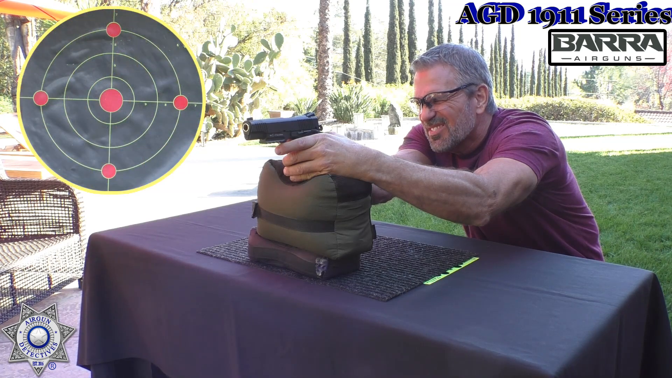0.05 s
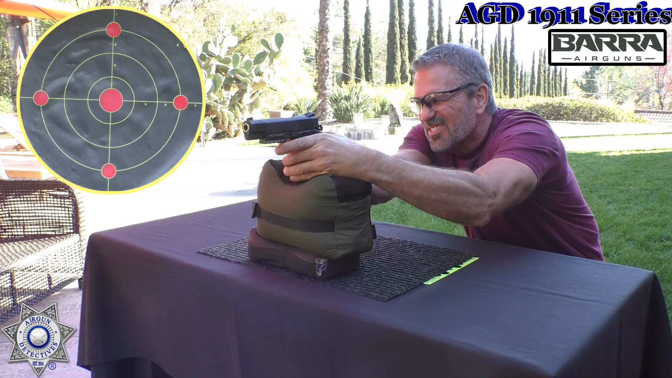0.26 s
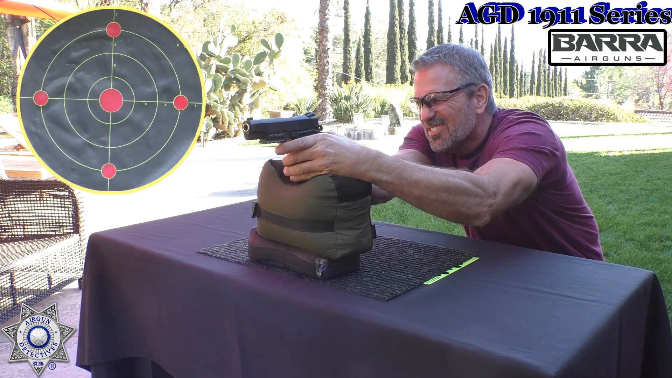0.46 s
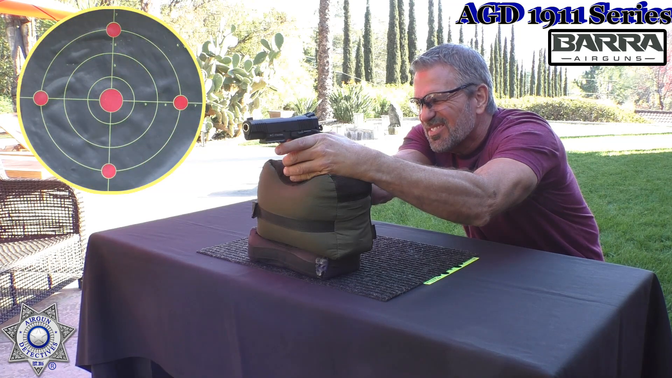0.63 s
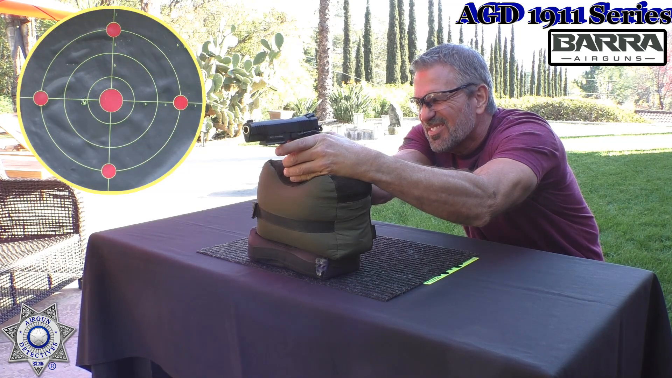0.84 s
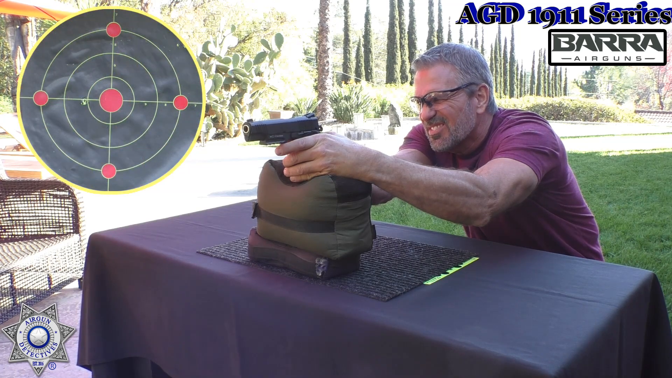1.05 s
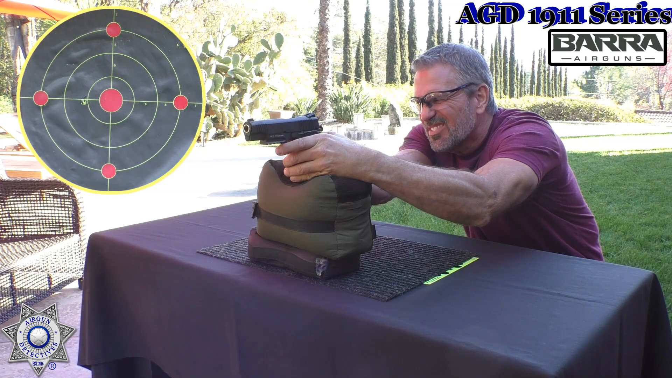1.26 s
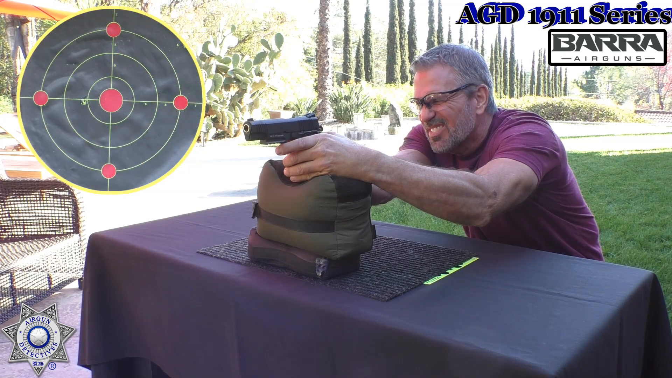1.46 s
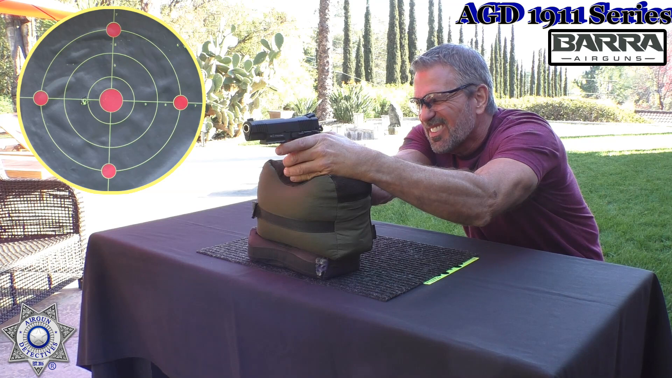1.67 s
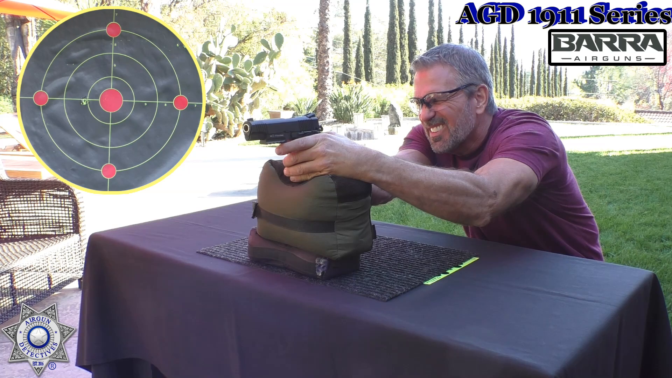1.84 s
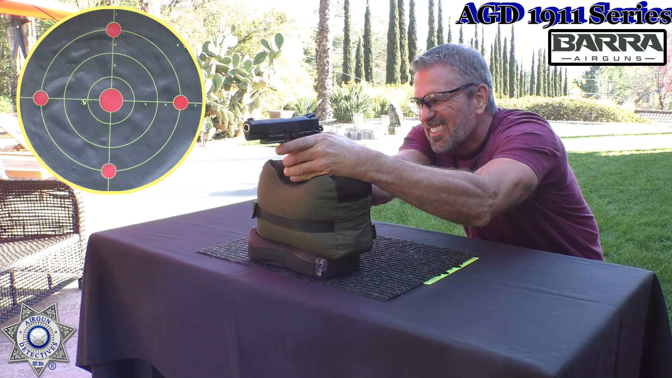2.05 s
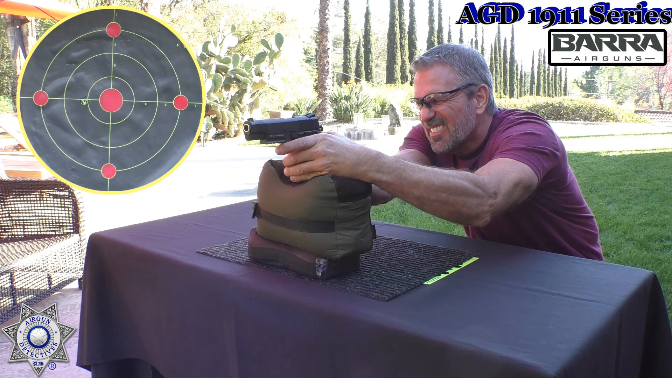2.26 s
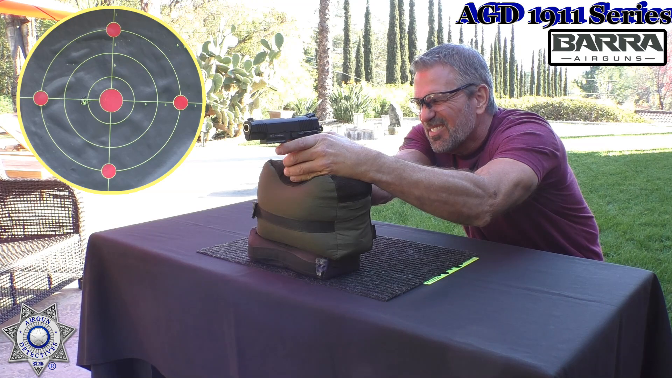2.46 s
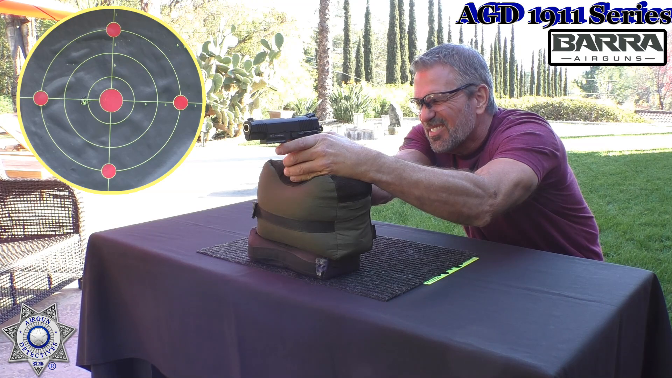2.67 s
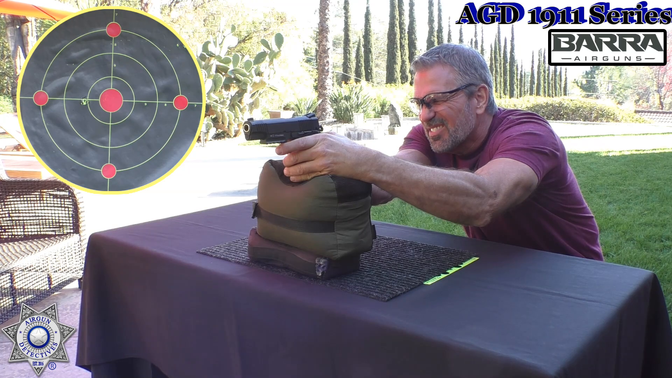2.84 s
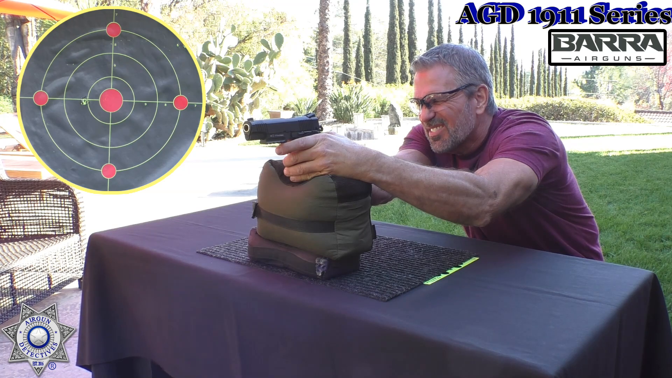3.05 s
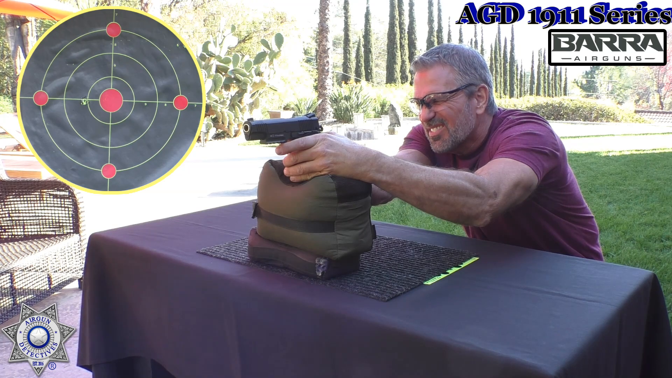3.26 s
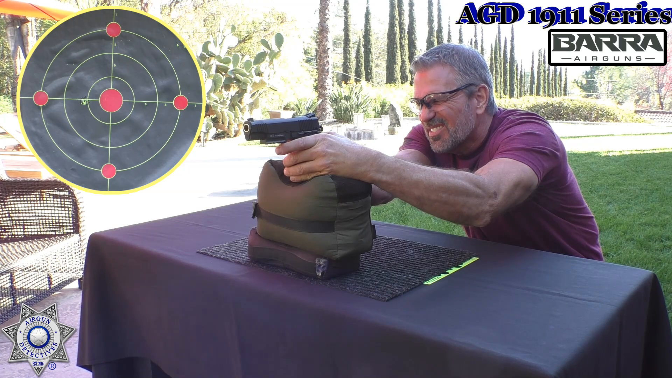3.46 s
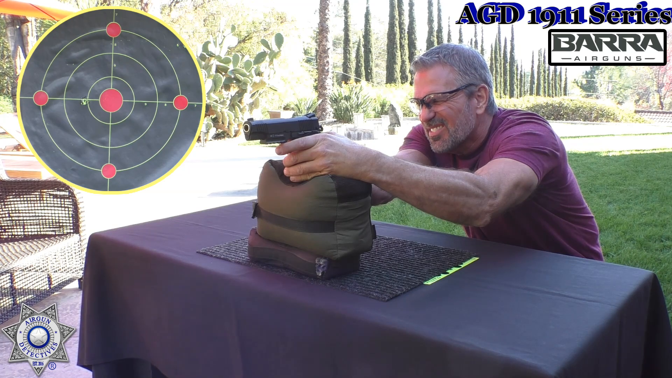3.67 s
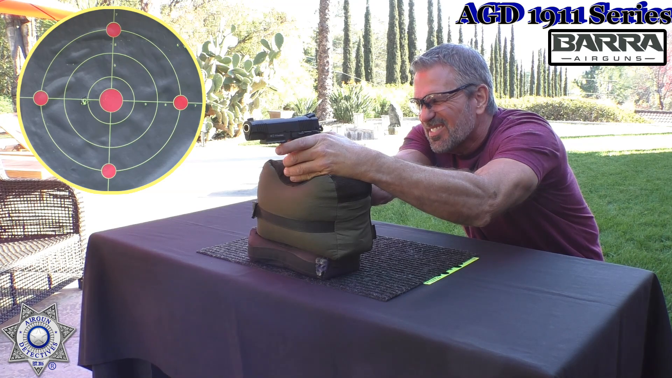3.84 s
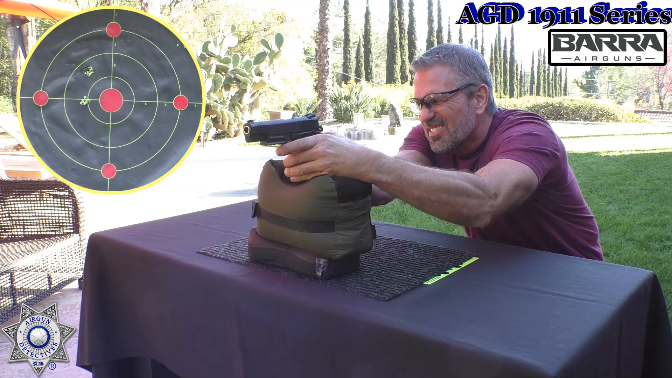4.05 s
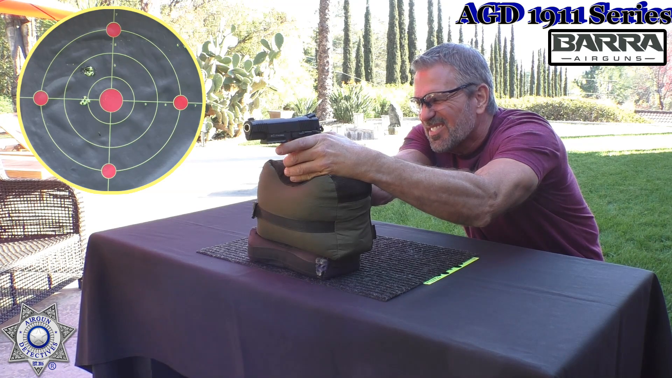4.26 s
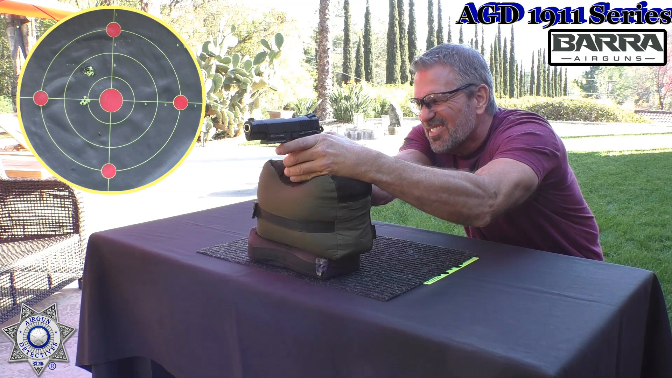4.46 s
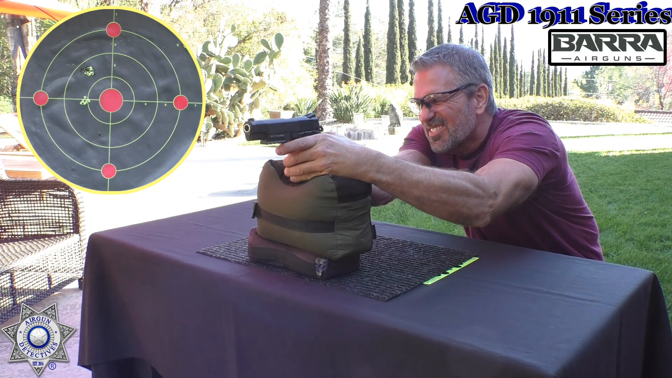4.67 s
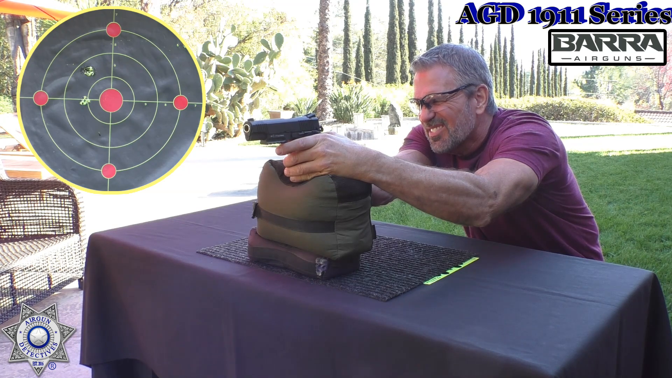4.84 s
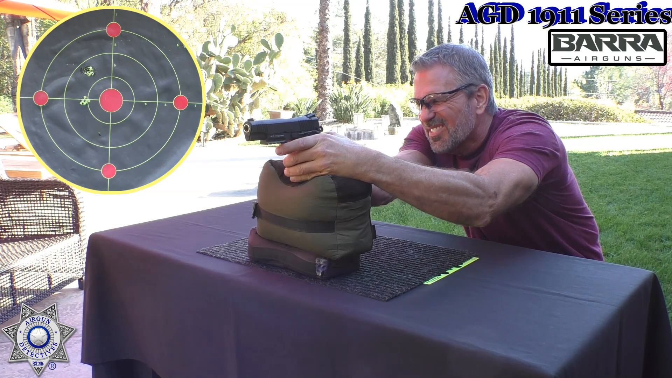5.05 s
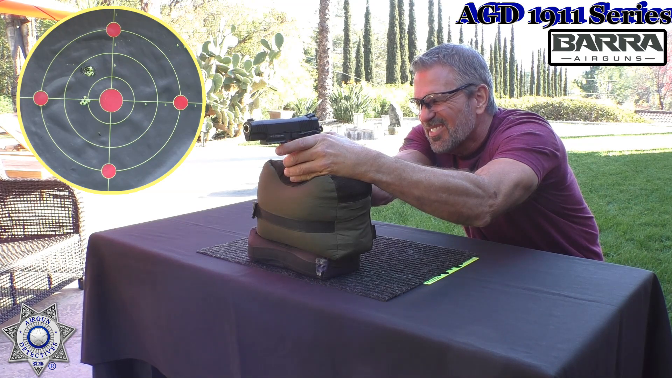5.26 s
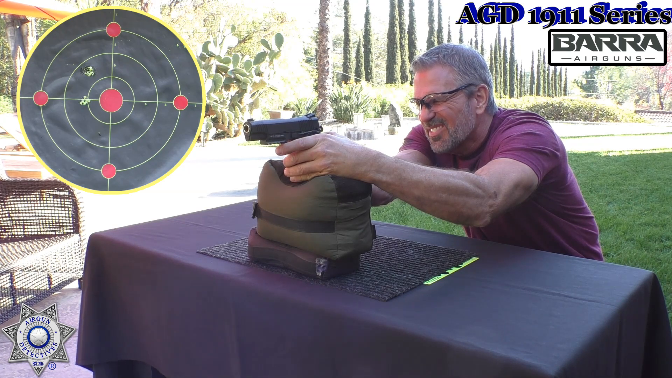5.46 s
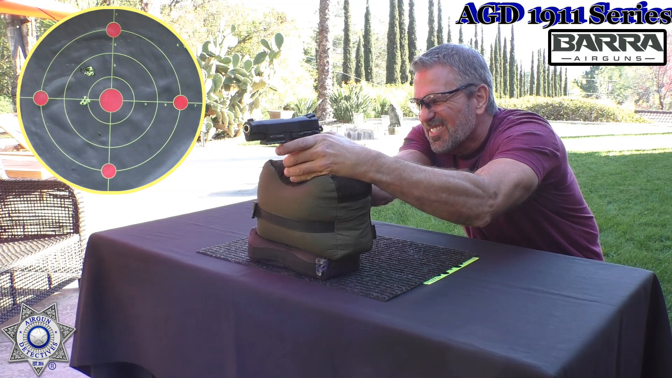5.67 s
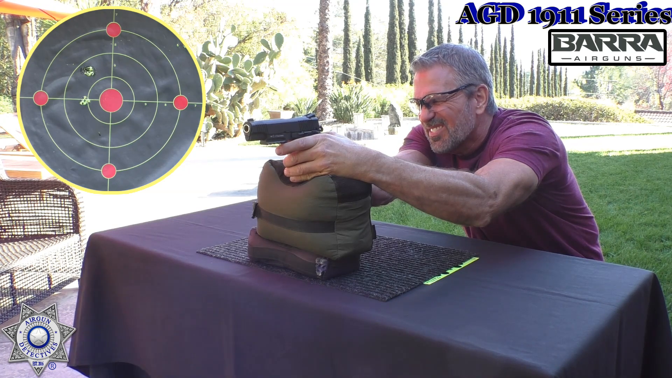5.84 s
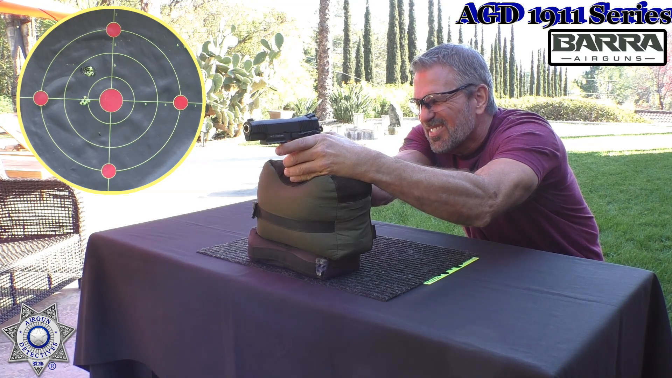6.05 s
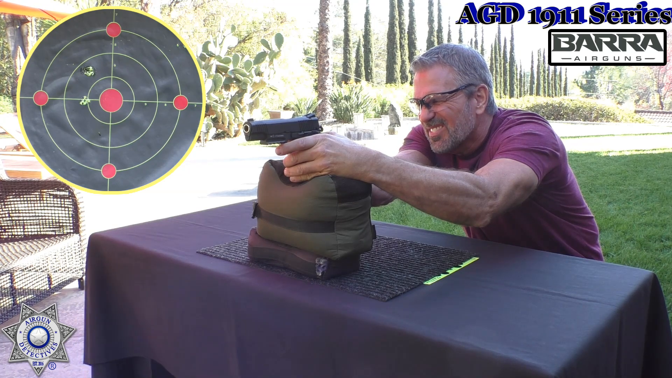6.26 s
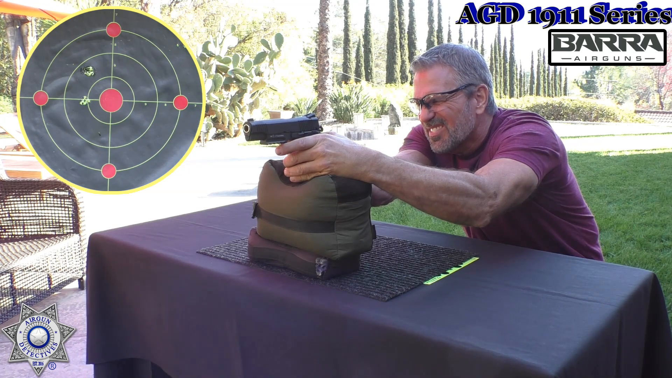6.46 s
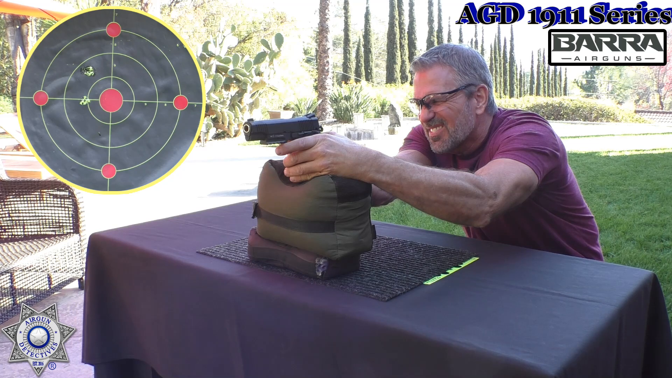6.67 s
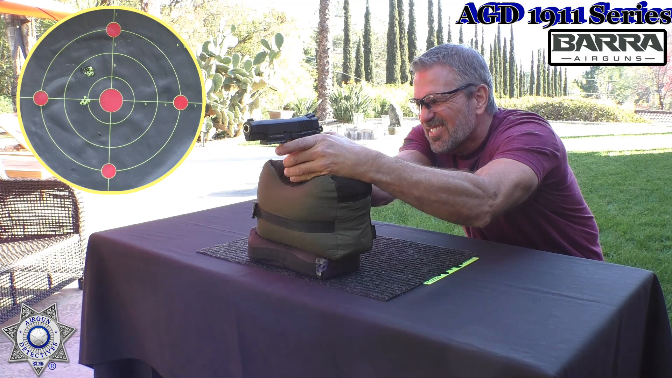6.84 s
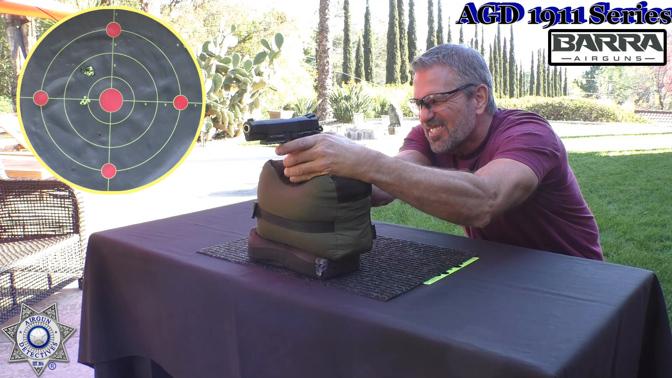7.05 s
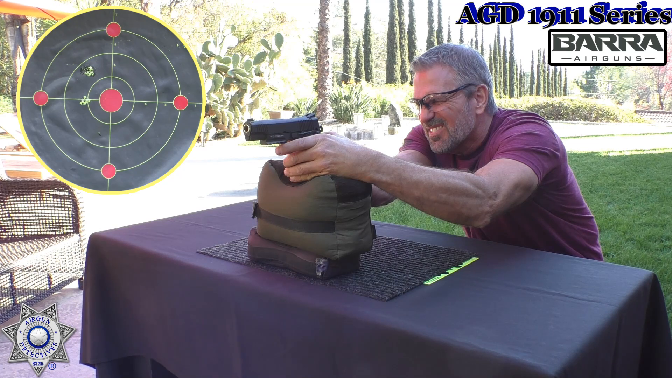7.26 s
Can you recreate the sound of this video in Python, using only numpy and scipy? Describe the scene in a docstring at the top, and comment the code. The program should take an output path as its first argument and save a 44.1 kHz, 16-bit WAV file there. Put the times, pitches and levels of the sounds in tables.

```python
"""Gas pistol in a garden

Two shots close to the mic, each a hammer blow, a muzzle crack with a low thump, the slide flying back
and slamming home. The garden returns a wash of echoes; pellets hit and bounce further off, some ringing
sheet metal. A far crow caws, small ticks come from the table and the trigger parts click at the end,
all over a bed of distant traffic, faint hums and hiss."""
import sys
import numpy as np
from scipy import signal
from scipy.fft import rfft, irfft
from scipy.io import wavfile
from scipy.ndimage import uniform_filter1d

SR = 44100
rng = np.random.default_rng(int(sys.argv[2]) if len(sys.argv) > 2 else 0)


def transcribe(u):
    """Save the signal u as a 16-bit wav file named by the first command-line argument.

    u: samples, shape (n,) or (channels, n), limited to [-1, 1]; the rate is SR.
    q: integer samples, one column per channel.
    """
    v = np.clip(np.atleast_2d(u).T, -1, 1)
    q = np.round(v * 32767).astype(np.int16)
    wavfile.write(sys.argv[1], SR, q)


N = 322371

# tone of the traffic and hiss bed: f/Hz, level/dB
BED_EQ = [(12, -56), (20, -22), (53, -7.5), (113, -0.5), (172, -4.5), (204, -2), (410, -9), (446, -6.5),
          (607, -18), (678, -16), (825, -15), (1400, -6.5), (5850, -21.5), (10500, -22), (16000, -26.5)]
# its stereo image: f/Hz, left-right correlation
BED_CORRELATION = [(60, 0.72), (130, 0.86), (290, 0.77), (640, 0.91), (1410, 0.75), (3100, 0.52), (6820, 1),
                   (15000, 0.44)]
# its balance: f/Hz, left over right/dB
BED_PAN = [(60, 1), (180, 0.5), (550, -0.5), (1650, 0.3), (4970, 2.1), (15000, 0.5)]
# its fader ride: t/s, level/dB, rumble boost/dB
BED_RIDE = [(0.0, -53, 0), (.85, -52.5, 4), (1.15, -49.5, -0.8), (2.1, -53.5, 2), (2.52, -52.5, .5),
            (3.9, -53.5, 1.2), (4.17, -51.5, 4), (4.35, -52, 0.5), (5.3, -54, 2), (6.03, -54, 1.2),
            (6.47, -54.5, 3), (7.31, -55.5, 3.5)]
# a ring after the first pellet hit, then distant hums: start/s, end/s, f/Hz, level/dB
LOW_TONES = [(.98, 1.2, 490, -54), (1.5, 3.7, 210, -63.5), (1.05, 3.3, 441, -67), (2.2, 3.2, 63, -62.5),
             (4.3, 6.2, 110, -62.5)]
# crow calls: t/s, length/s, level/dB, top pitch/Hz, beak opening/0-1
CAWS = [(0.249, 0.082, -56.5, 707, .1), (1.615, 0.14, -56.5, 655, .4), (1.762, 0.134, -57, 662, .5),
        (2.17, 0.1, -55, 672, .7), (2.628, 0.115, -55, 668, .65), (3.657, 0.13, -61, 682, 0),
        (4.651, 0.084, -55.5, 705, 0.18), (4.945, .1, -55, 633, .75), (5.057, 0.08, -56.5, 709, 0.2),
        (5.364, .15, -55, 638, .9), (5.5, 0.058, -55.5, 725, 0.4), (5.815, 0.138, -53.5, 632, .95),
        (5.947, 0.086, -58.5, 670, 0.53), (6.12, 0.083, -61, 621, 0.5)]
# formants of the crow's throat: f/Hz, width/Hz, level/dB
FORMANTS = [(1283, 290, -0.5), (1770, 560, 4), (3000, 1100, -10)]
# tone of pellet hits and ticks: f/Hz, level/dB
SPRAY_EQ = [(180, -40), (300, -26), (701, -22), (915, -11.5), (1250, -7), (1810, -3.5), (2170, -4.5),
            (2570, -5), (7200, -13), (16000, -24)]
# faint ticks from the table: t/s, level/dB, resonance/Hz
TICKS = [(.1038, -45.5, 7000), (.4649, -49.5, 7000), (2.92, -49, 12000), (3.162, -50, 5000),
         (3.687, -49, 4800), (4.901, -43, 5000), (5.593, -52, 7000), (6.166, -51, 9000),
         (6.31, -51.5, 8800), (6.454, -45.5, 3600), (7.078, -54, 10900)]
# pellet hits: t/s, level/dB, attack/ms, t60/ms, tilt/(dB/oct), resonance/Hz, width/Hz, boost/dB
PELLET_HITS = [(.9279, -30, .4, 25, 4, 11000, 4000, 3), (.99, -34, 3.4, 270, 0.1, 1850, 90, 8),
               (1.0859, -22, 2, 268, -1.5, 1290, 250, 3.5), (1.342, -45, 1.4, 190, -7, 1320, 150, 5),
               (1.394, -36.5, 1.5, 223, 3.5, 8000, 1800, 4), (4.211, -39, .5, 25, 7, 14000, 3000, 2),
               (4.228, -25.5, 7.2, 196, 0, 2580, 200, 7), (4.24, -30.5, 5.1, 305, -2.5, 2010, 160, 9),
               (4.491, -45, 4, 640, 1.2, 1410, 150, 10), (4.536, -42, 6, 580, -1.5, 6500, 900, 7),
               (4.56, -31, 2.3, 100, 12, 8250, 500, 6), (4.582, -37, 7.2, 290, 8, 5050, 200, 12),
               (4.6, -36.5, 1.1, 200, 8, 8300, 350, 11), (4.615, -40, 8.1, 230, 10, 10650, 350, 16)]
# hits on sheet metal: t/s, level/dB, left over right/dB
CLANGS = [(1.0852, -26, 5), (4.233, -46.5, 7), (4.492, -46.5, 2)]
# modes of the sheet: f/Hz, level/dB, t60/s
SHEET_MODES = [(720, -2, .03), (1340, 6, .045), (2800, -1, .03), (42, -20, .15), (930, -2, .15),
               (1040, -2, .17), (1770, -6, .29), (1845, -9, .3), (2510, -5, .2), (2620, -9, .25),
               (3068, -14, .3), (3750, -12, .2), (4985, -15, .2)]
# echo envelope: t after the shot/s, level/dB, tilt/(dB/oct)
ECHO_ENVELOPE = [(.02, -42, -1), (.052, -39, 4.5), (0.071, -38.5, -3.5), (.11, -31.5, 3), (.15, -36.5, 0.5),
                 (.24, -39.5, 0), (.3, -45, -2.5), (.38, -53.5, -3.5), (.46, -70, 2)]
# tone of the echoes: f/Hz, level/dB
GARDEN_EQ = [(120, -32), (200, -14), (347, -4.5), (722, -30), (1020, -5), (1560, -5), (1940, -3),
             (2210, -4.5), (2700, -1.5), (4950, -6.5), (12200, -13.5), (16000, -25)]
# stereo image of the garden: f/Hz, left-right correlation
GARDEN_CORRELATION = [(60, 0.39), (130, 0.71), (290, 0.41), (640, 0.3), (1410, 0.09), (3100, 0.094),
                      (6820, 1), (15000, 0.43)]
# ring of the pistol's frame, heard in the echoes: f/Hz, width/Hz, boost/dB
FRAME_RESONANCES = [(1906, 30, 10), (2750, 35, 3), (3600, 42, -1), (3900, 45, -3), (4420, 50, 5),
                    (4945, 44, 8), (5040, 51, 5), (5550, 120, 1), (5930, 60, 1), (6600, 45, 5.5)]
# trigger clicks: t/s, level/dB
TRIGGER_CLICKS = [(7.236, -30.5), (7.278, -38)]
# bounces within a click: delay/ms, level/dB, attack/ms, t60/ms
CHATTER = [(0, -0.5, 0.47, 29), (7.5, -6.5, 1.5, 36), (18, -11.5, 2, 130)]
# ring of the trigger parts: f/Hz, width/Hz, boost/dB
TRIGGER_RESONANCES = [(1740, 140, 9), (3330, 330, 11), (4840, 290, 9), (5720, 200, 7), (6700, 500, 3.5)]
# tone of the pistol's action: f/Hz, level/dB
PISTOL_EQ = [(290, -23), (450, -15), (729, -40), (1000, -5.5), (1790, -0.5), (2070, -0.5), (3750, -2),
             (4870, -5.5), (5240, -4.5), (10400, -6), (16000, -21)]
# blows of hammer, valve, muzzle, gas on the slide and out of the breech, slide back, frame and grip:
# t after the valve opens/ms, level/dB, attack/ms, t60/ms, tilt/(dB/oct), left-right correlation
ACTION_BLOWS = [(-2, -35, 1.5, 95, 8, 1), (-0.3, -11, 0.58, 26, 5, 0.9), (2, -9.5, 0.083, 15.5, 2.5, 0.82),
                (3, -6, .4, 6.8, 1, 0.72), (4.3, -5, 0.17, 6.2, 2, .99), (9, -16.5, 0.25, 18, 4, 0.71),
                (11, -19, 0.54, 38, -1.5, 0.81), (15.5, -24, 0.87, 87, 0.5, 0.51),
                (20.3, -36, 1.5, 93, -3, 0.46)]
# the slide lands and rebounds: same columns, t from the landing
HOME_BLOWS = [(0, -15.5, .25, 18, 5.6, 0.98), (3.6, -27, 1.5, 94, 3.5, 0.92)]
# sharpest metal snaps: t after the valve opens/ms, level/dB, first f/Hz, last f/Hz, length/ms
METAL_CRACKS = [(4.4, -6, 6000, 4000, .33), (9.05, -10, 4800, 2800, .45)]
# lasting ring of the slide: f/Hz, level/dB, t60/s
SLIDE_MODES = [(1950, -48, .6), (3490, -40, 0.9), (5030, -45, .4)]
# shots: t/s, muzzle crack/dB, its first f/Hz, blast delay/ms, blast height, left overload thump height,
# slide home delay/ms, slide ring trim/dB, echo trim/dB, echo tilt/(dB/oct)
SHOTS = [(.7062, -3, 5900, 3.7, -.13, .06, 61.6, 0, .5, -.5),
         (3.9943, -8, 2600, 2.45, -.08, .47, 64.7, -5, -.3, .5)]


def amp(db):
    """dB to gain."""
    return 10 ** (np.asarray(db) / 20)


def panned(db, pan_db):
    """Stereo gains, left over right by pan_db."""
    return amp(db + pan_db * np.array([[.5], [-.5]]))


def unit_rms(x):
    """Scales to rms 1."""
    return x / np.sqrt(np.mean(x ** 2) + 1e-20)


def wobble(count, smoothing):
    """Random modulation of rms 1, averaged over `smoothing` points."""
    return unit_rms(uniform_filter1d(rng.standard_normal(count), smoothing))


def curve(points, hz):
    """Reads a table on a log-frequency axis."""
    f, value = np.transpose(points)
    return np.interp(np.log(hz + 1), np.log(f + 1), value)


def octaves(hz):
    """Octaves above 4 kHz, held flat below 500 Hz."""
    return np.log2(np.clip(hz, 500, None) / 4000)


def peaks(rows, hz):
    """EQ in dB of resonances (f/Hz, width/Hz, boost/dB) over a flat spectrum."""
    return 10 * np.log10(1 + sum(amp(2 * db) / (1 + (2 * (hz - f) / width) ** 2) for f, width, db in rows))


def add(mix, s, sound):
    """Mixes a sound in at time s."""
    part = mix[:, round(s * SR):][:, :sound.shape[-1]]
    part += sound[..., :part.shape[1]]


def noise(count, eq, correlation):
    """Stereo noise coloured by eq(hz) in dB, its width set by correlation(hz)."""
    left, spare = rfft(rng.standard_normal((2, count)))
    hz = np.fft.rfftfreq(count, 1 / SR)
    shared = np.clip(correlation(hz), -1, 1)
    right = shared * left + np.sqrt(1 - shared ** 2) * spare
    return unit_rms(irfft(amp(eq(hz)) * np.array([left, right]), count))


def moving_eq(x, gain_db, size):
    """Weights the short-time spectrum by gain_db(hz, s)."""
    hz, t, frames = signal.stft(x, SR, nperseg=size, noverlap=3 * size // 4)
    frames = frames * amp(gain_db(hz[:, None], t))
    return signal.istft(frames, SR, nperseg=size, noverlap=3 * size // 4)[1][:, :x.shape[1]]


def burst(db, attack_ms, t60_ms, eq, correlation, pan_db, damping, count=4096):
    """A blow of noise through many small modes; it rises fast and dies, treble first."""
    t = np.arange(count) / SR
    modes_db = 4 * wobble(count // 2 + 1, count // 640)
    x = noise(count, lambda hz: eq(hz) + modes_db, correlation)
    decay_db = lambda s: -60000 * s / t60_ms
    x = moving_eq(x, lambda hz, s: decay_db(s) * damping * np.maximum(octaves(hz) + 2, 0), size=128)
    envelope = (1 - np.exp(-1000 * t / attack_ms)) * amp(decay_db(t))
    return x * envelope * panned(db, pan_db)


def traffic_bed():
    """Traffic rumble and hiss; patches of the spectrum drift and the treble flickers."""
    s, db, rumble_db = np.transpose(BED_RIDE)
    bed = noise(N, lambda hz: curve(BED_EQ, hz), lambda hz: curve(BED_CORRELATION, hz))

    def gain_db(hz, t):
        patches = rng.standard_normal((len(t), len(hz))).T
        patches = unit_rms(uniform_filter1d(uniform_filter1d(patches, 10, 0), 14, 1))
        lows = 1 / (1 + (hz / 300) ** 2)
        flicker = .98 * (1 - lows) * wobble(len(t), 3)
        ride = np.interp(t, s, db) + lows * np.interp(t, s, rumble_db)
        pan = np.array([.5, -.5])[:, None, None] * curve(BED_PAN, hz)
        return ride + .72 * patches + flicker + pan
    return moving_eq(bed, gain_db, size=1024)


def low_tones():
    """Faint, wavering low tones: a ring after the first pellet hit, and distant hums."""
    out = np.zeros((1, N))
    for start, end, hz, db in LOW_TONES:
        count = len(np.arange(start, end, 1 / SR))
        pitch = hz * (1 + .00797 * wobble(count, 9000))
        level = amp(db + 2 * wobble(count, 9000))
        tone = np.sin(2 * np.pi * np.cumsum(pitch) / SR)
        add(out, start, level * tone * signal.windows.tukey(count, .15))
    return out


def caw(length_s, db, top_hz, beak):
    """Hoarse pulses through a throat; a wider beak arches the pitch more, brightens and rasps."""
    phase = np.arange(0, 1, 1 / length_s / SR)
    count = len(phase)
    first_hz, last_hz = top_hz * (1 - .13 * beak ** 2), top_hz * (1 - .14 * beak ** 2)
    pitch = np.interp(phase, [0, .15, .3, .55, 1], [first_hz, first_hz, top_hz, top_hz, last_hz])
    turns = np.cumsum(pitch * (1 + .011 * wobble(count, 200))) / SR
    pulses = unit_rms(sum(np.cos(2 * np.pi * k * turns) for k in range(1, 6)))
    rasp = 3.8 * (.35 + .4 * beak) * rng.standard_normal(count)
    hz = np.fft.rfftfreq(count, 1 / SR)
    upper_db = -19 + 18.5 * beak
    throat = sum(amp(level + trim) / (1 + (2 * (hz - f) / width) ** 2)
                 for (f, width, level), trim in zip(FORMANTS, [0, upper_db, upper_db]))
    voice = unit_rms(irfft(rfft(pulses + rasp) * throat, count))
    flutter_db = 1.6 * wobble(count, 700)
    return amp(db + flutter_db) * voice * signal.windows.tukey(count, .6)


def crow():
    """Far caws, smeared by a short reverb for distance."""
    calls = np.zeros((1, N))
    for s, *shape in CAWS:
        add(calls, s, caw(*shape))
    tail = rng.standard_normal((2, 8192)) * amp(-60 * np.arange(8192) / SR / .35)  # t60 0.35 s
    wet = signal.oaconvolve(calls, tail / np.linalg.norm(tail[0]), axes=1)[:, :N]
    return 1.18 * calls + .72 * wet


def spray(db, attack_ms, t60_ms, tilt, ring_hz, width_hz, boost_db):
    """A gritty spray of noise with one resonance, spread by the garden."""
    eq = lambda hz: curve(SPRAY_EQ, hz) + tilt * octaves(hz) + peaks([(ring_hz, width_hz, boost_db)], hz)
    correlation = lambda hz: curve(GARDEN_CORRELATION, hz)
    x = burst(db, attack_ms, t60_ms, eq, correlation, pan_db=1.5, damping=.014, count=12288)
    grit_db = 1.35 * wobble(x.shape[1], 90)
    return x * amp(grit_db)


def table_ticks():
    """Small, bright ticks from the table."""
    out = np.zeros((2, N))
    for s, db, hz in TICKS:
        add(out, s, spray(db, attack_ms=1.5, t60_ms=46, tilt=4.5, ring_hz=hz, width_hz=1900, boost_db=6))
    return out


def pellets():
    """Pellets hit and bounce in sprays of noise; some set sheet metal ringing."""
    out, t = np.zeros((2, N)), np.arange(16384) / SR
    for s, *shape in PELLET_HITS:
        add(out, s, spray(*shape))
    lag_s = np.array([[0], [.0002]])  # the clang reaches the right capsule later
    sheet = sum(amp(db - 60 * t / t60) * np.sin(2 * np.pi * hz * (t - lag_s))
                for hz, db, t60 in SHEET_MODES)
    attack = 1 - np.exp(-t / .0005)
    for s, db, pan_db in CLANGS:
        add(out, s, panned(db, pan_db) * sheet * attack)
    return out


def garden_echoes():
    """Walls and trees return each shot as an uneven wash of shifting brightness."""
    out = np.zeros((2, N))
    delay, db, tilt = np.transpose(ECHO_ENVELOPE)
    t = np.arange(delay[0], delay[-1], 1 / SR)
    eq = lambda hz: curve(GARDEN_EQ, hz) + peaks(FRAME_RESONANCES, hz)
    for s, *_, trim_db, shot_tilt in SHOTS:
        wash = noise(len(t), eq, lambda hz: curve(GARDEN_CORRELATION, hz))
        brightness = lambda hz, at: (np.interp(at + delay[0], delay, tilt) + shot_tilt) * octaves(hz)
        wash = moving_eq(wash, brightness, size=256)
        lumps_db = 1.6 * wobble(len(t), 130)  # single reflectors stand out
        envelope = amp(np.interp(t, delay, db) + trim_db + lumps_db)
        add(out, s + delay[0], wash * envelope * signal.windows.tukey(len(t), .04))
    return out


def trigger():
    """Small sprung parts click and chatter."""
    out = np.zeros((2, N))
    eq = lambda hz: (curve(PISTOL_EQ, hz) + peaks(TRIGGER_RESONANCES, hz)
                     + 1.5 * octaves(hz) - 15 * (hz < 1300))
    for s, db in TRIGGER_CLICKS:
        for ms, bounce_db, attack, t60 in CHATTER:
            click = burst(db + bounce_db, attack, t60, eq, lambda hz: .85, pan_db=3.1, damping=.037)
            add(out, s + ms / 1000, click)
    return out


def ring(db, hz, attack_s, t60_s):
    """One mode that swells and dies."""
    t = np.arange(SR // 2) / SR
    return amp(db - 60 * t / t60_s) * (1 - np.exp(-t / attack_s)) * np.sin(2 * np.pi * hz * t)


def crack(db, first_hz, last_hz, length_ms):
    """A few cycles whose pitch drops as the pressure falls."""
    phase = np.arange(0, 1, 1000 / length_ms / SR)
    pitch = np.interp(phase, [0, .45, .62, 1], [first_hz, first_hz, last_hz, last_hz])
    return amp(db) * np.sin(2 * np.pi * np.cumsum(pitch) / SR) * signal.windows.tukey(len(phase), .3)


def thump(blast_ms, blast_height, overload_left):
    """A centred blast and rebound, plus the overloaded mic's low thump, opposite in the two channels."""
    ms = np.arange(1024) * 1000 / SR
    bump = lambda at_ms, width_ms: np.exp(-.5 * ((ms - at_ms) / width_ms) ** 2)
    blast = blast_height * bump(blast_ms, .56)
    rebound = .06 * bump(10, 1.3)
    left = overload_left * bump(6, .67) - .09 * bump(7.6, .56)  # thump, then overshoot
    right = .2 * bump(4.8, .4) - .35 * bump(6, .67)  # counter-swing, then thump
    return blast + rebound + np.array([left, right])


def pistol():
    """Each shot cycles the action: metal blows, crack of gas, low thump, grip knock and slide ring."""
    out = np.zeros((2, N))
    grip_hz, grip_t60_s = 405, .04
    for s, crack_db, crack_hz, blast_ms, blast_height, overload_left, home_ms, slide_db, *_ in SHOTS:
        home = s + home_ms / 1000
        for start, blows in ((s, ACTION_BLOWS), (home, HOME_BLOWS)):
            for ms, db, attack, t60, tilt, correlation in blows:
                eq = lambda hz: curve(PISTOL_EQ, hz) + tilt * octaves(hz)
                blow = burst(db, attack, t60, eq, lambda hz: correlation, pan_db=.8, damping=.02)
                add(out, start + ms / 1000, blow)
        add(out, s + .0021, crack(crack_db, crack_hz, last_hz=1800, length_ms=1.2))  # muzzle
        for ms, *shape in METAL_CRACKS:
            add(out, s + ms / 1000, crack(*shape))
        add(out, s, thump(blast_ms, blast_height, overload_left))
        # the hollow grip knocks on the shot and again as the slide lands
        add(out, s + .0111, -ring(-23.5, grip_hz, attack_s=.00021, t60_s=grip_t60_s))
        add(out, home, ring(-39, grip_hz, attack_s=.0018, t60_s=grip_t60_s))
        for hz, db, t60 in SLIDE_MODES:
            add(out, home, ring(db + slide_db, hz, attack_s=.042, t60_s=t60))
    return out


def scene():
    """All layers at the mic."""
    foreground = pistol() + trigger() + garden_echoes() + pellets() + table_ticks()
    return foreground + crow() + low_tones() + traffic_bed()


def record(dry):
    """Soft saturation rounds the cracks, then a steep low-pass trims the top."""
    saturated = 1.267 * np.tanh(dry / 1.322)
    lowpass = signal.firwin(511, 16100, window=("kaiser", 9), fs=SR)
    return signal.oaconvolve(saturated, lowpass[None], "same")


dry = scene()
out = record(dry)
transcribe(out)
```